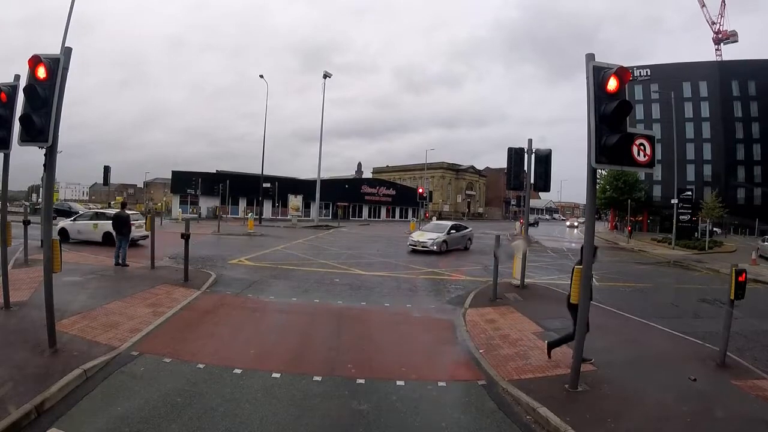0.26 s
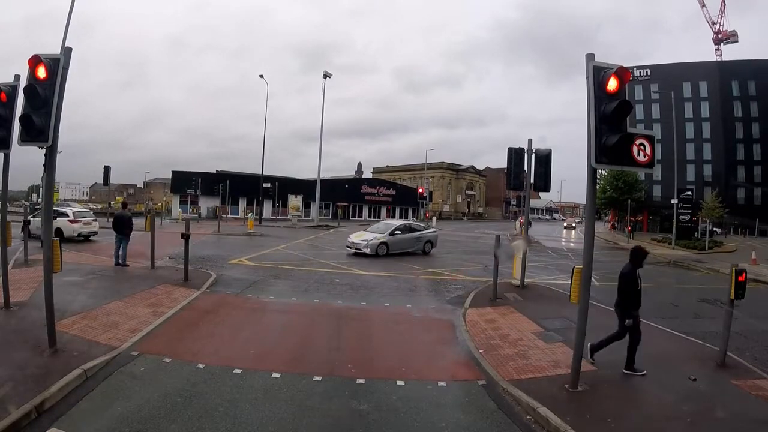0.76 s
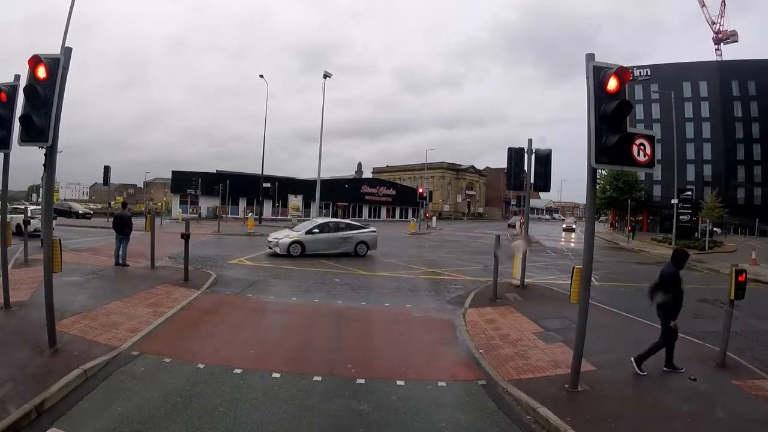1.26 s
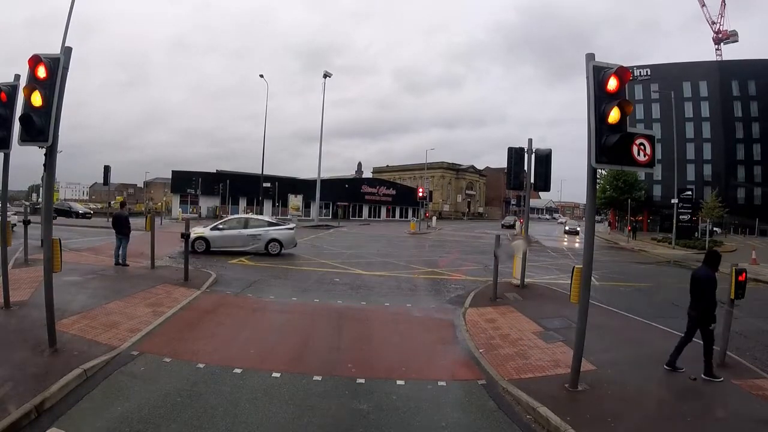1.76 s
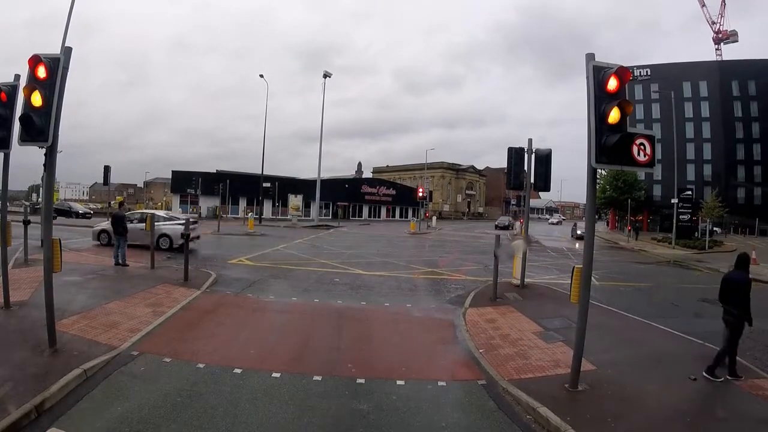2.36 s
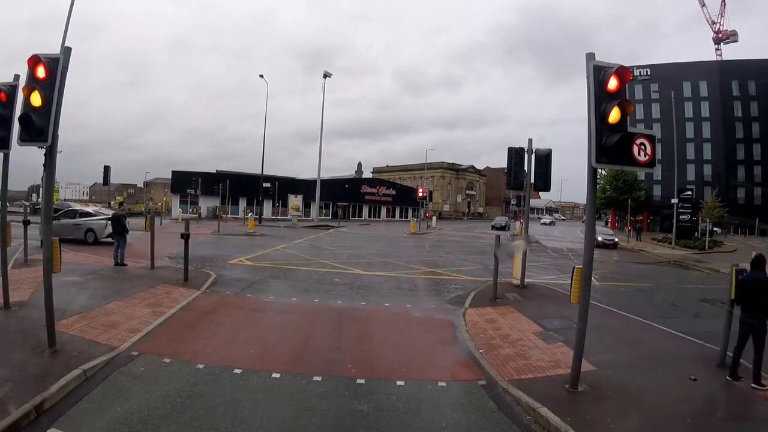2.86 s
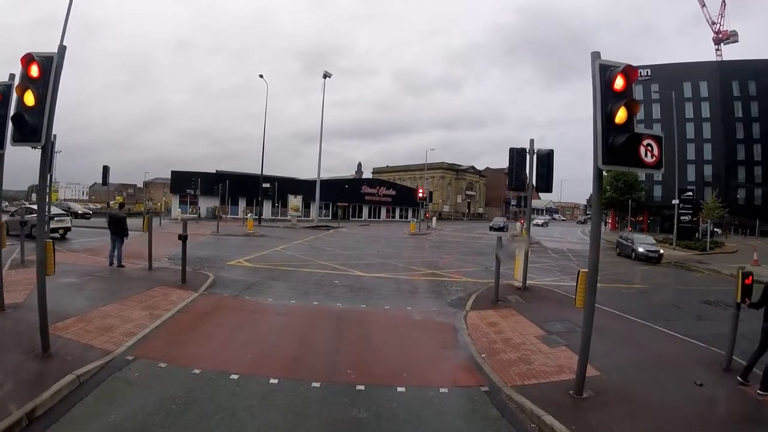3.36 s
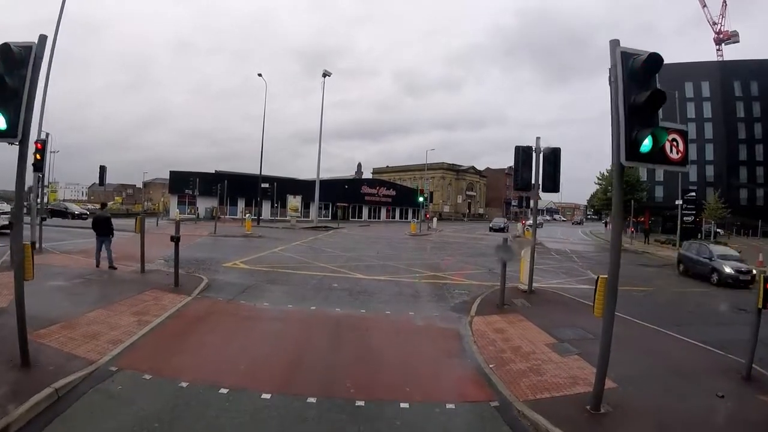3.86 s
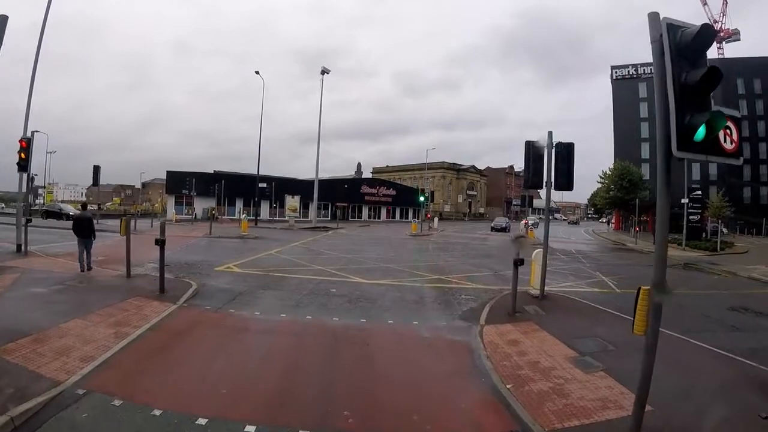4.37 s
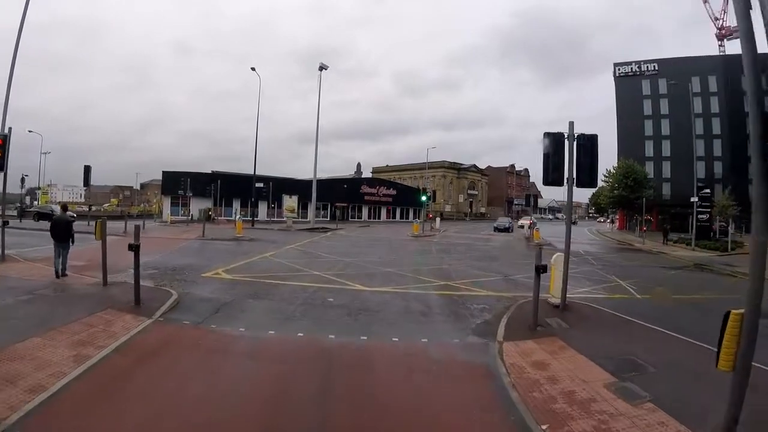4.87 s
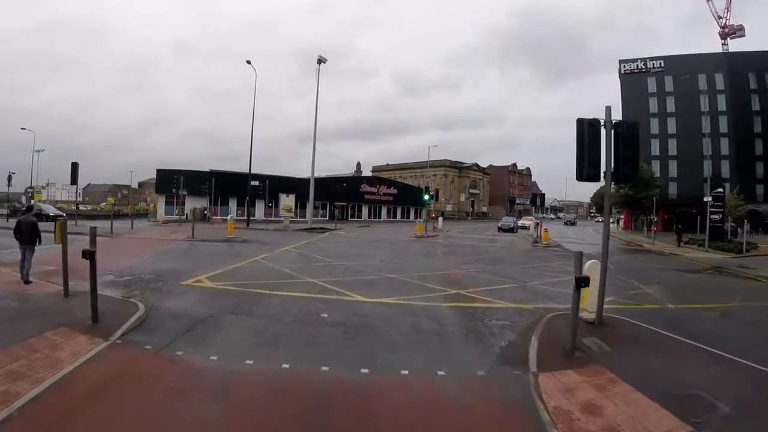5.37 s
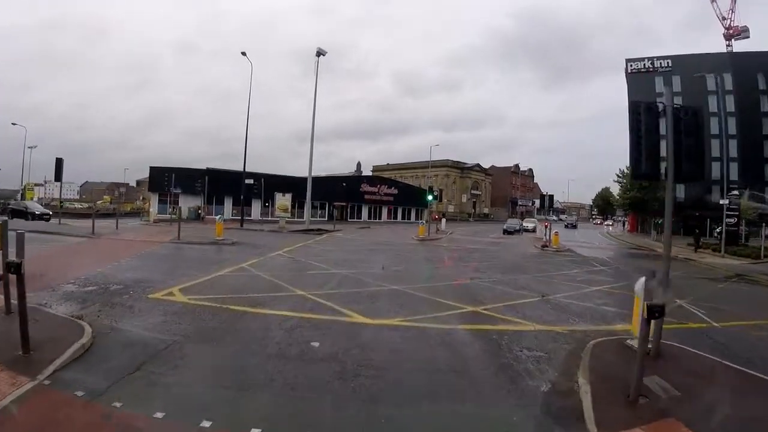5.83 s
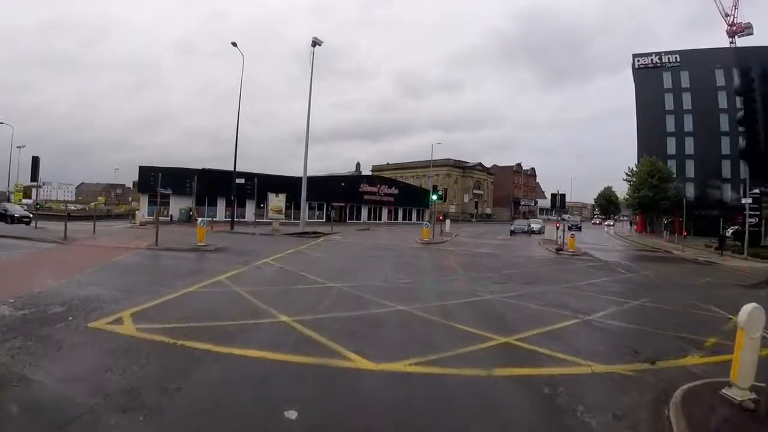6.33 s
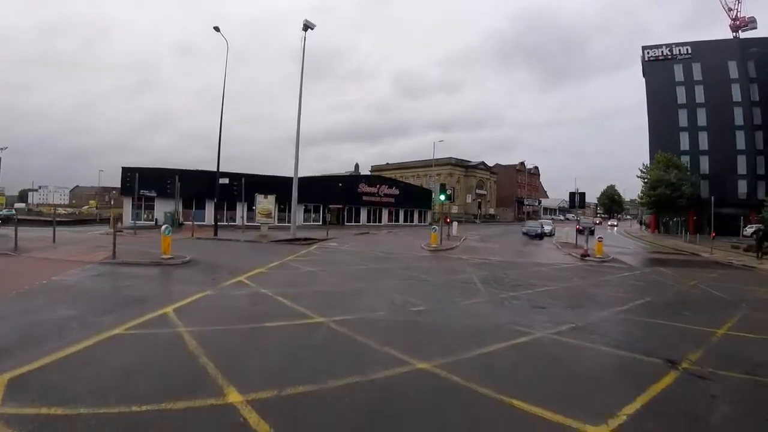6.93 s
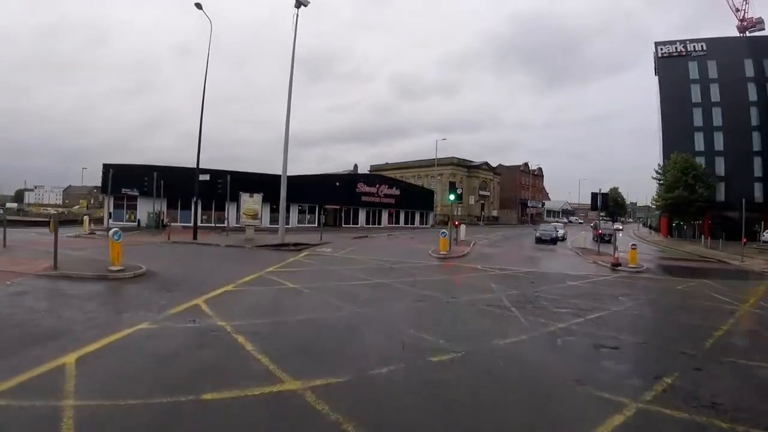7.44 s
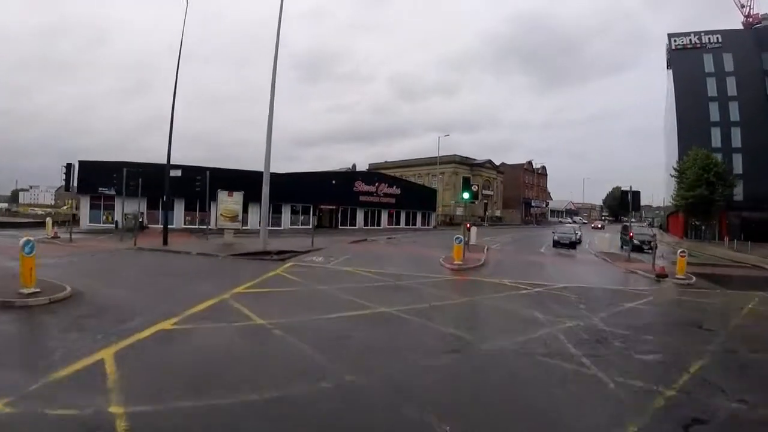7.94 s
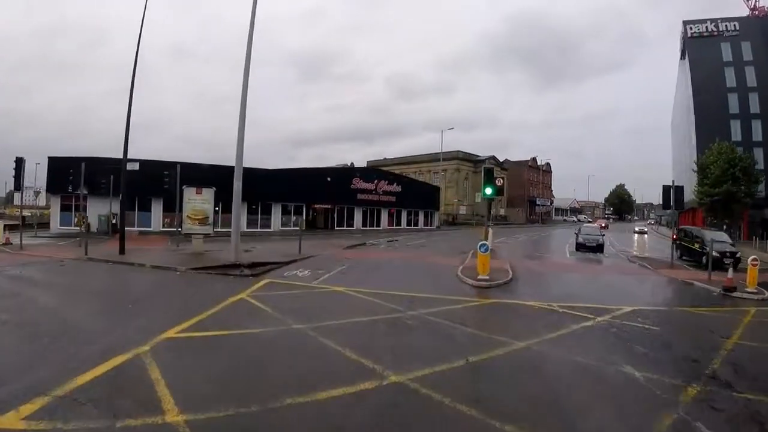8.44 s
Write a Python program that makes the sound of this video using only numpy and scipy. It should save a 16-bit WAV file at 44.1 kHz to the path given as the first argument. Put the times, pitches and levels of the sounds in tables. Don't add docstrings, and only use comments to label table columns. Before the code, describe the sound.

Inside a bus, a few metres from the engine, on a small camera microphone with audible automatic gain. From 0 to 2.3 s a deep six-cylinder diesel idles evenly over a steady low pump hum and dull cabin noise. At 2.3 s a tiny high squeak comes, then at 2.4 s a brief ringing valve click, a knock and a floor thump as the brakes release. The engine sags until 2.75 s, then recovers and climbs, with small clicks at 3.2 to 3.7 s. From 4.4 s the gear grips: fuller boom, harsher roar and singing panels, strongest near 5.1 s, with trim buzzing over bumps. Pitch peaks about 7.3 s, after the throttle eases; a short squeak at 7.2 s marks the upshift. The drone slides down until 8.1 s, then rises slightly and holds, with heavy low jolts and soft rattles to the end at 8.7 s.

```python
import sys
import numpy as np
from scipy import signal
from scipy.fft import rfft, irfft, next_fast_len
from scipy.io import wavfile
from scipy.ndimage import uniform_filter1d, minimum_filter1d

SR = 44100
rng = np.random.default_rng(int(sys.argv[2]) if len(sys.argv) > 2 else 0)


def wav_record(signal):
    frames = np.transpose(np.atleast_2d(signal))
    bounded = np.clip(frames, -1, 1)
    quanta = np.round(bounded * 32767).astype(np.int16)
    wavfile.write(sys.argv[1], SR, quanta)


def volts(x):
    e = np.asarray(x, float) / 20
    return 10 ** e


N = 383669
T = np.arange(N) / SR

# (time [s], firing rate [Hz])
SPEED = [(0, 35), (2.48, 35), (2.65, 29.7), (2.75, 28.2), (3.0, 30.8), (3.15, 34.8), (3.27, 40.2),
         (3.7, 45.3), (4.5, 57), (5.7, 71.8), (6.9, 92.2), (7.05, 93.9), (7.28, 95.9), (7.41, 88.7),
         (7.65, 75.5), (8.13, 55.5), (8.25, 60), (8.7, 61.2)]
# (time [s], load [share 0-1])
LOAD = [
    (0, 0),
    (3.8, 0.11),
    (4.4, 0.41),
    (5.1, 1),
    (5.6, .85),
    (6.0, 0.78),
    (6.35, 0.75),
    (6.7, 0.1),
    (7.5, .05),
    (8.7, .05),
]
# (time [s], gain [dB])
GAIN = [(0, 1), (.63, -0.55), (2.2, -2), (2.5, 2), (2.76, -1.5), (3.1, -7), (3.41, -4), (3.71, -1.5),
        (3.95, -6), (4.3, -7), (4.75, -4), (5.6, -4.5), (6.2, -0.5), (6.8, -3.5), (7.5, -2), (7.85, -5),
        (8.3, -1.5), (8.7, -5)]
# (multiple of the firing rate, level [dB])
WEAK_ORDERS = [(.667, -45), (1.333, -31), (1.667, -38), (2.833, -38), (3, -25), (3.333, -35), (5, -39),
               (6, -32), (7, -38), (8, -35), (9, -40), (10, -42), (12, -43), (14, -45)]
# (centre [Hz], width [Hz], level [dB])
BOOMS = [(28.85, 12, -8.5), (47.2, 20, -8.5), (65.6, 7, -14), (87.9, 14.3, -8), (118.4, 15.7, -4.5),
         (135.7, 14, -9), (144.2, 9.7, -11.5), (162.6, 15, -12), (213, 40, -18.5), (254.3, 24, -13.5),
         (287.7, 30, -10.5), (329.4, 20, -14), (368, 39, -14.5), (444, 60, -7)]
# (multiple of the hum, level [dB])
HUM = [(1, -17), (2, -34), (3, -45), (4, -37), (5, -29), (6, -47), (7, -40), (8, -37), (9, -47), (10, -46),
       (11, -47), (12, -47), (13, -50), (14, -46), (15, -52), (16, -57), (17, -63), (18, -52), (19, -60),
       (20, -63)]
# (time [s], body level [dB], floor level [dB], length [s])
BUMPS = [(2.415, -38.5, -32, 0.29), (3.12, -40.5, -28, 0.23), (4.497, -32.5, -35, 0.17),
         (4.729, -23.5, -38, 0.2), (5.001, -23.5, -33.5, 0.17), (5.168, -21.5, -38, 0.11),
         (5.363, -20.5, -32, 0.77), (5.792, -16.5, -36.5, 0.15), (6.2, -19.5, -29.5, 0.22),
         (6.531, -23.5, -37, 0.092), (6.949, -12, -32, 0.36), (7.5, -24, -27.5, 0.2), (7.692, -11, -35, .3),
         (8.175, -12.5, -28, .15), (8.316, -10.5, -30, 0.11), (8.551, -16, -35, .2)]
# (centre [Hz], width [Hz], level [dB])
BODY = [(27.56, 4.3, -2), (19.3, 5, -17), (51.5, 18, -5.5)]
# (centre [Hz], width [Hz], level [dB])
FLOOR = [(91.6, 25, 1.5), (121.3, 25, 1.5), (155.6, 81, -4.5)]
# (idle level [dB], share of camera gain [dB/dB], at full load [dB], gear held [dB], high revs [dB])
ROAR = [(-29, .8, 0.5, 0.95, 5), (-37, 0.97, 4, 0.65, -0.6), (-36, 1.1, 5, 1, -0.5),
        (-52.5, 0.92, 1, 4, 2.3)]
# (edge [Hz], ...)
ROAR_EDGES_HZ = (170, 450, 900, 2500, 8000)
# (frequency [Hz], density [dB per Hz])
ROAR_COLOUR = [(6, -55.5), (22, -56.5), (45, -52), (100, -54.5), (185, -59.5), (260, -58), (460, -65.5),
               (560, -68.5), (1100, -72), (2300, -82), (4000, -94.5), (5200, -103), (10000, -116),
               (16500, -135)]
# (centre [Hz], width [Hz], level [dB])
PANELS = [(1086, 73, -0.5), (1283, 65, -7), (963, 120, -8.5), (2120, 390, -13.5)]
# (centre [Hz], width [Hz], level [dB])
CABIN = [(478, 45, 0), (410, 40, -5), (295, 40, -3)]
# (centre [Hz], width [Hz], level [dB])
GLASS = [(3830, 600, 1), (6130, 560, -6.5)]
# (time [s], dull level [dB], bright level [dB], 60 dB decay [s])
RATTLES = [(2.424, -27, -52, .1), (2.5386, -37, -64, .1), (2.558, -35, -64, .13), (3.187, -43, -58, .12),
           (3.342, -44, -58, .12), (3.6625, -46, -46, .08), (3.6887, -48, -57, .1), (3.7294, -47, -58, .1),
           (7.188, -48, -53, .04), (8.24, -43, -60, .11), (8.521, -39, -52, .13)]
# (frequency [Hz], level [dB], 60 dB decay [s])
VALVE = [(1550, -15, .06), (1150, -26, .05), (3250, -26, .03)]
# (time [s], level [dB], length [s])
SHUDDERS = [(4.63, -53, .05), (4.791, -55, .04), (4.842, -52, 0.067), (4.93, -54, .7), (4.985, -50, .07),
            (5.101, -47, 0.049), (5.21, -52, 0.046), (5.255, -55, .06), (5.338, -58, 0.043),
            (5.618, -53.5, .06), (6.131, -53, .08), (7.17, -52, 0.14), (7.39, -57.5, 0.12),
            (7.588, -56, 0.078), (7.733, -58, 0.064), (7.92, -56, 0.069), (8.285, -49, 0.13)]
# (centre [Hz], width [Hz], level [dB])
TRIM = [(2170, 830, 4.5), (3830, 1100, -1), (6000, 900, -11), (8000, 1800, -18.5), (11000, 1500, -22.5)]
# (time [s], length [s], pitch [Hz], level [dB], 60 dB tail [s])
SQUEAKS = [
    (2.308, .036, 5900, -41, .15),
    (7.197, .014, 3800, -39, .26),
    (4.845, .03, 6100, -62, .1),
]
# (frequency [Hz], level [dB])
WHINES = [(7800, -91), (11670, -90), (15566, -92.5), (15633, -92.5)]

AWAY_S = 2.45, 2.7
GRIP_S = 4.3, 4.5


def curves(table):
    s, *columns = np.transpose(table)
    return [np.interp(T, s, c) for c in columns]


def ramp(x, ends):
    return np.clip((x - ends[0]) / (ends[1] - ends[0]), 0, 1)


def unit(x):
    return x / np.sqrt(np.mean(x ** 2))


def walk(rate):
    hold = int(SR / rate)
    steps = np.repeat(rng.standard_normal(N // hold + 1), hold)
    return 1.6 * uniform_filter1d(uniform_filter1d(steps, hold), hold)[:N]


def tone(turns, db, rough_db, rate):
    size = np.sqrt(2) * volts(db + rough_db * walk(rate))
    return size * np.sin(2 * np.pi * turns + 0.039 * rough_db * walk(rate))


def band(lo_hz, hi_hz):
    edges = signal.butter(3, (lo_hz, hi_hz), "band", fs=SR, output="sos")
    return unit(signal.sosfilt(edges, rng.standard_normal(N)))


def ring(x, hz, width_hz):
    return signal.lfilter(*signal.iirpeak(hz, hz / width_hz, fs=SR), x)


def resonators(modes, level, flicker_db, rate):
    out = np.zeros(N)
    for hz, width_hz, db in modes:
        noise = rng.standard_normal(N)
        mode = unit(ring(ring(noise, hz, width_hz), hz, width_hz))
        out += volts(db + flicker_db * walk(rate)) * mode
    return level * out


def since(s):
    return np.arange(min(N - int(s * SR), SR)) / SR


def add(out, s, x):
    start = int(s * SR)
    out[start:start + len(x)] += x


def swells(events):
    push = np.zeros(N)
    for s, db, length in events:
        t = since(s) / (.3 * length)
        add(push, s, volts(db) * np.e * t * np.exp(-t))
    return push


def boom_db(hz):
    grid = np.arange(1., 1500)
    power = volts(2 * -27.5)
    for centre, width, db in BOOMS:
        power = power + volts(2 * db) / (1 + (2 * (grid - centre) / width) ** 2) ** 2
    return np.interp(hz, grid, 10 * np.log10(power))


def engine(hz, load, gain_db, away, grip):
    turns = np.cumsum(hz) / SR
    half_db = -32 + 17 * grip
    second_db = -12.5 + 4 * load
    fourth_db = -18.5 + 4 * grip + .7 * gain_db
    out = tone(turns, boom_db(hz), .4, 8)
    out += tone(3 / 2 * turns, boom_db(3 / 2 * hz) + half_db, 1.1, 8)
    out += tone(2 * turns + .2, boom_db(2 * hz) + second_db, .9, 8)
    out += tone(4 * turns + .3, boom_db(4 * hz) + fourth_db, .8, 8)
    lift_s, lift_width_s, lift_db = 7.19, 0.13, -6.5
    out *= volts(lift_db * np.exp(-((T - lift_s) / lift_width_s) ** 2))
    weak_db = 1 - 11 * away + 6 * grip + 0.68 * gain_db
    muffled_db = .028 * np.maximum(hz - hz[0], 0)
    for multiple, db in WEAK_ORDERS:
        lift = .6 * (boom_db(multiple * hz) - boom_db(multiple * hz[0])) - muffled_db * multiple
        exact = np.round(6 * multiple) / 6
        out += tone(exact * turns + rng.random(), db + weak_db + lift, 1.1, 8)
    return out


def pump(gain_db, away, grip):
    hum_hz, ease_s = 49.93, (6.3, 6.7)
    low_db = 1.2 * gain_db + 4 * grip - 10 * ramp(T, ease_s)
    high_db = 0.63 * gain_db - 7.5 * away + 1.5
    out = tone(hum_hz * T, HUM[0][1] + low_db, .6, 6)
    for multiple, db in HUM[1:]:
        out += tone(np.round(multiple) * hum_hz * T + rng.random(), db + high_db, .7, 6)
    return out


def chassis(load, grip):
    s, body_db, floor_db, length = np.transpose(BUMPS)
    rolling_s = np.maximum(T - AWAY_S[0], 0)
    shake = volts(-40.5 + 3.5 * rolling_s) + swells(zip(s, body_db, length))
    boards = volts(-41 + 9 * grip + 1.5 * load) + swells(zip(s, floor_db, length))
    return resonators(BODY, shake, 2.2, 5) + resonators(FLOOR, boards, 1.5, 6)


def roar(hz, load, gain_db, grip):
    high_revs = ramp(hz, (57.5, 94))
    bands_db = np.array(ROAR) @ [np.ones(N), gain_db, load, grip, high_revs]
    size = next_fast_len(N)
    bins_hz = np.arange(1, size // 2 + 2) * SR / size
    colour_hz, colour_db = np.transpose(ROAR_COLOUR)
    colour = volts(np.interp(np.log(bins_hz), np.log(colour_hz), colour_db))
    spectrum = rfft(rng.standard_normal(size)) * colour
    edges = np.array(ROAR_EDGES_HZ)
    power = []
    for lo, hi in zip(edges, edges[1:]):
        inside = (bins_hz > lo) & (bins_hz < hi)
        power.append(2 * np.sum(abs(spectrum[inside]) ** 2) / size ** 2)
    gains_db = bands_db - 10 * np.log10(power)[:, None]
    centres = np.log2(edges[1:] * edges[:-1]) / 2
    out = np.zeros(N)
    for octave in np.arange(3, 14.5, .5):
        share = np.array([np.interp(octave, centres, row) for row in np.eye(len(centres))])
        window = np.clip(1 - 2 * abs(np.log2(bins_hz) - octave), 0, 1)
        out += volts(share @ gains_db + 0.88 * walk(9)) * irfft(spectrum * window, size)[:N]
    return out


def shell(hz, load, away, grip):
    lugging = ramp(hz, (36, 31))
    air_db = -45 + 7 * lugging + 2.5 * away - 5 * grip
    glass_db = -71.5 + 5 * grip + 4 * load
    panels = resonators(PANELS, volts(-54.5 + 18 * load), 1.0, 12)
    air = resonators(CABIN, volts(air_db), 0.54, 8.9)
    return panels + air + resonators(GLASS, volts(glass_db), 1.3, 15)


def rattles():
    dull, bright = band(1200, 3700), ring(band(4300, 12500), 6500, 6000)
    contacts, out = volts(1.5 * walk(400)), np.zeros(N)
    for s, dull_db, bright_db, t60 in RATTLES:
        t = since(s)
        here = slice(int(s * SR), int(s * SR) + len(t))
        burst = (volts(dull_db) * dull[here] + volts(bright_db) * bright[here]) * contacts[here]
        tick = .8 * np.exp(-t / .003)
        onset = 1 - np.exp(-t / .002)
        add(out, s, (volts(-1.5 - 60 * t / t60) + tick) * onset * burst)
    return out


def brake_valve():
    release_s, out = 2.425, np.zeros(N)
    t = since(release_s)
    for hz, db, t60 in VALVE:
        decay = volts(db - 60 * t / t60) * (1 - np.exp(-t / .004))
        add(out, release_s, decay * np.sin(2 * np.pi * hz * t))
    return out


def shudders():
    return resonators(TRIM, swells(SHUDDERS), 1.5, 120)


def squeaks():
    flutter, drift, out = volts(2.6 * walk(200)), walk(250), np.zeros(N)
    for s, length, hz, db, t60 in SQUEAKS:
        t = since(s)
        here = slice(int(s * SR), int(s * SR) + len(t))
        tail_s = np.maximum(t - length, 0)
        bend = 1 + .018 * np.exp(-t / length) + .005 * drift[here]
        phase = 2 * np.pi * .99 * hz * np.cumsum(bend) / SR
        shape = np.clip(t / (.4 * length), 0, 1) * volts(db - 60 * tail_s / t60)
        fading = volts(-19.5 - 200 * tail_s)
        overtones = np.sin(2 * phase) + .6 * np.sin(2.1 * phase)
        add(out, s, shape * flutter[here] * (np.sin(phase) + fading * overtones))
    return out


def electronics():
    whine = sum(tone(hz * T, db, 3.0, 40) for hz, db in WHINES)
    return whine + volts(-70) * band(6000, 11000)


def scene():
    (hz,), (load,), (gain_db,) = curves(SPEED), curves(LOAD), curves(GAIN)
    away, grip = ramp(T, AWAY_S), ramp(T, GRIP_S)
    drive = engine(hz, load, gain_db, away, grip) + pump(gain_db, away, grip)
    body = chassis(load, grip) + roar(hz, load, gain_db, grip) + shell(hz, load, away, grip)
    events = rattles() + brake_valve() + shudders() + squeaks()
    return (drive + body + events + electronics())[None]


def low_pass(x):
    return signal.sosfilt(signal.butter(12, 15750, fs=SR, output="sos"), x)


def record(dry):
    peaks = -minimum_filter1d(-abs(dry), size=3000)
    envelope = uniform_filter1d(peaks, size=3000)
    limited = dry * np.minimum(1, 0.64 / (envelope + 1e-9)) ** 0.5
    mix = np.tanh(0.59 * limited) / 0.59
    return low_pass(mix)


dry = scene()
out = record(dry)
wav_record(out)
```